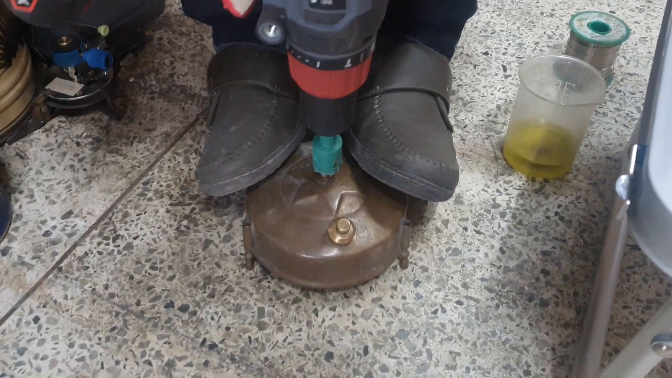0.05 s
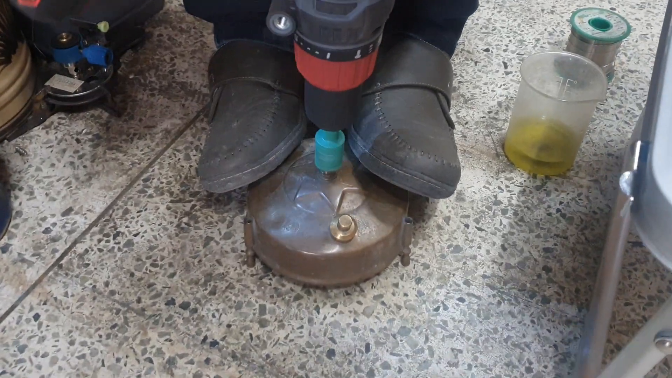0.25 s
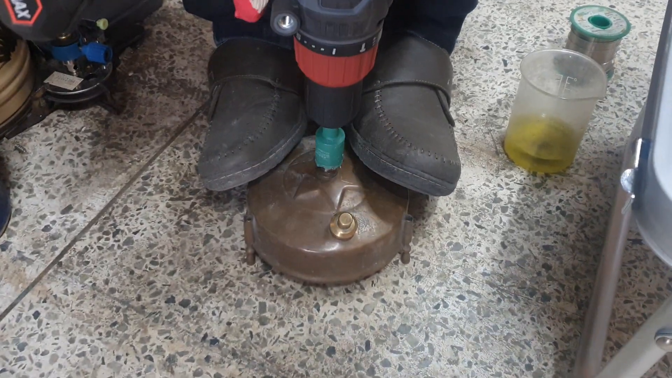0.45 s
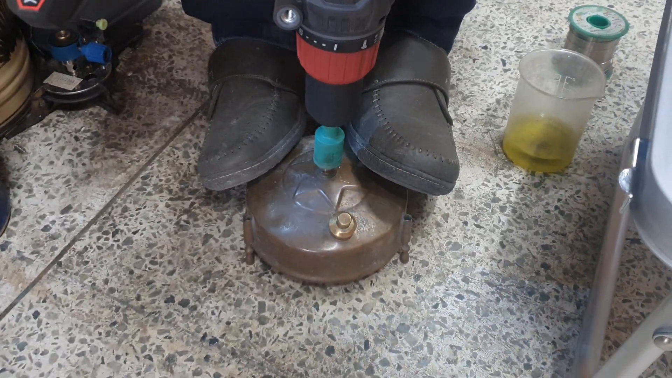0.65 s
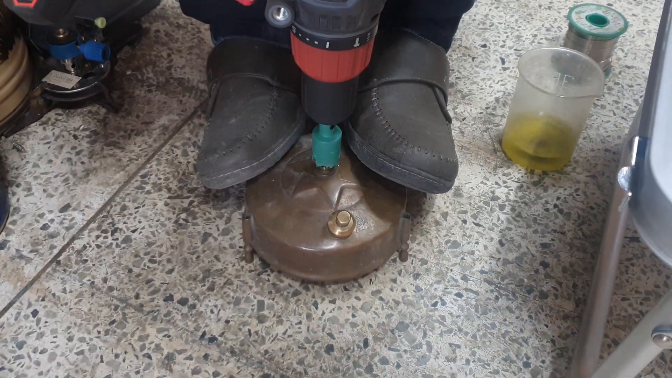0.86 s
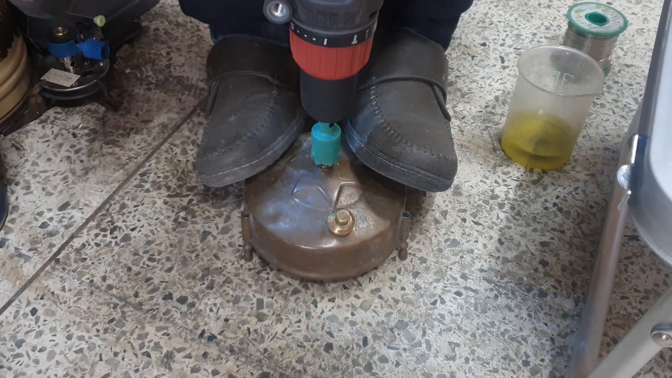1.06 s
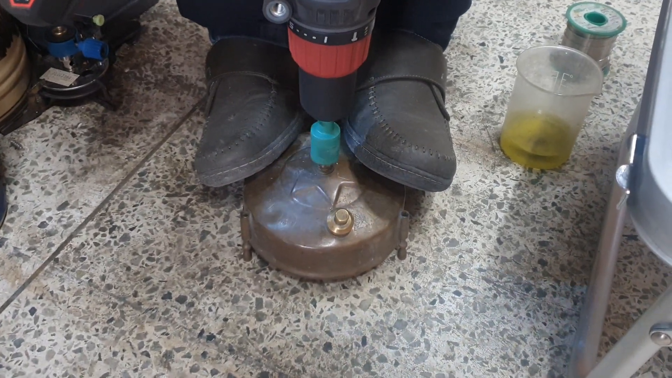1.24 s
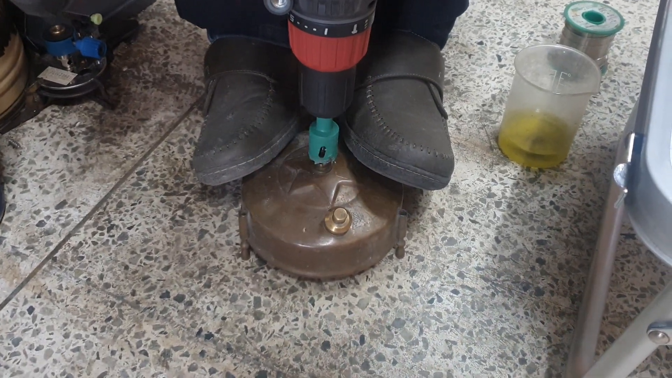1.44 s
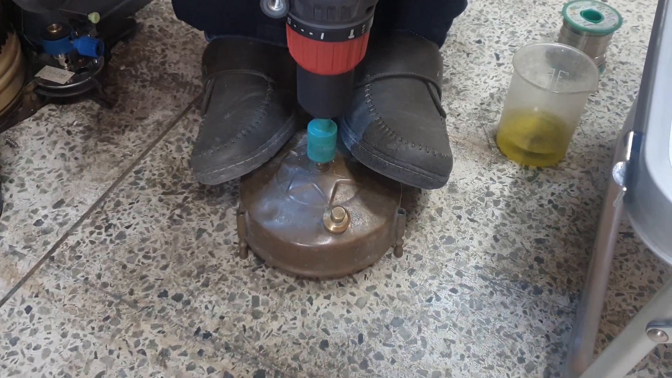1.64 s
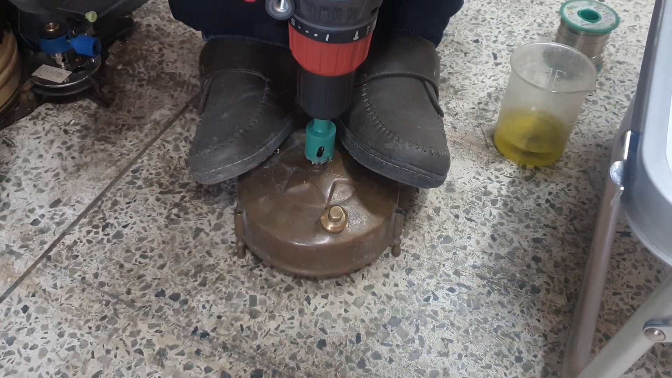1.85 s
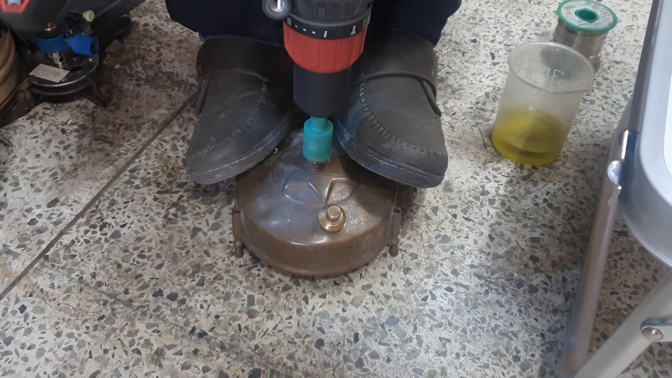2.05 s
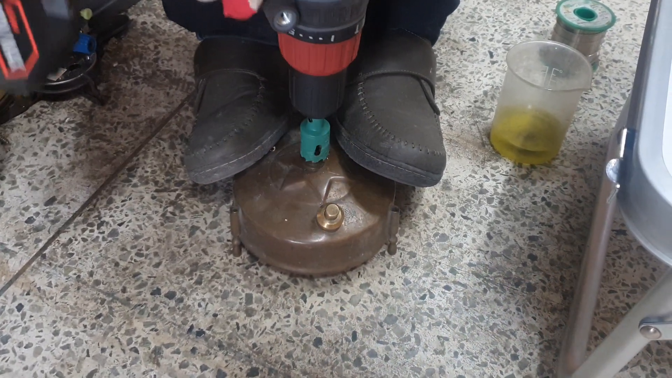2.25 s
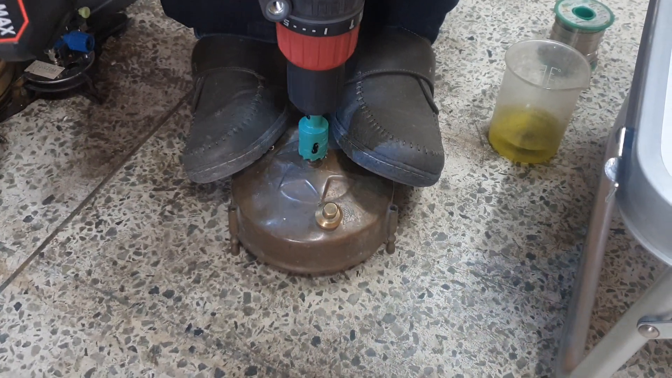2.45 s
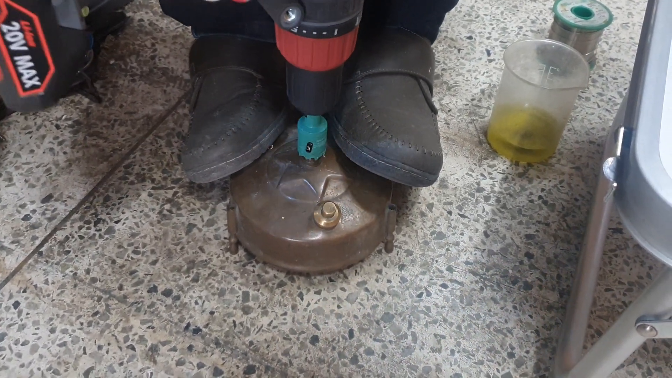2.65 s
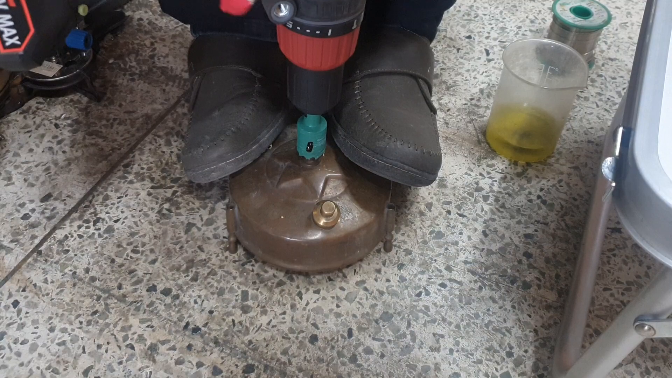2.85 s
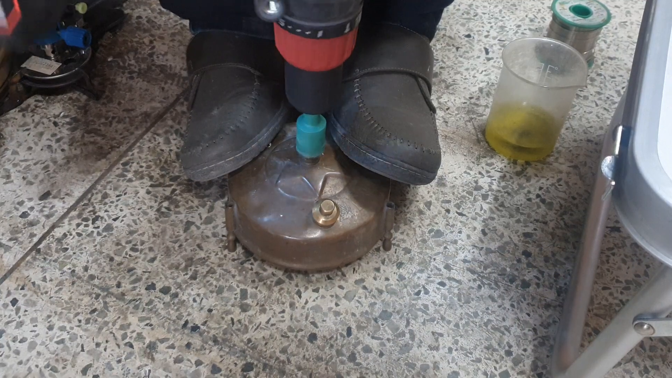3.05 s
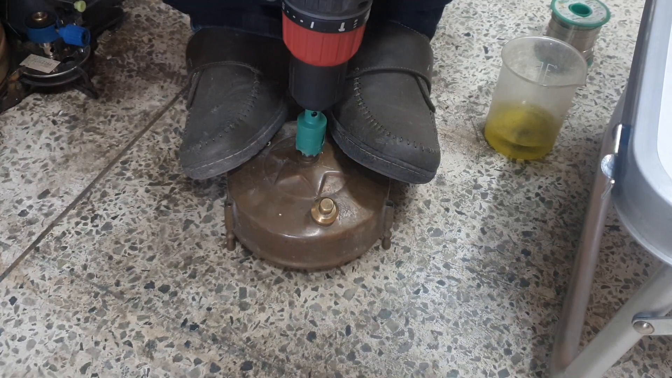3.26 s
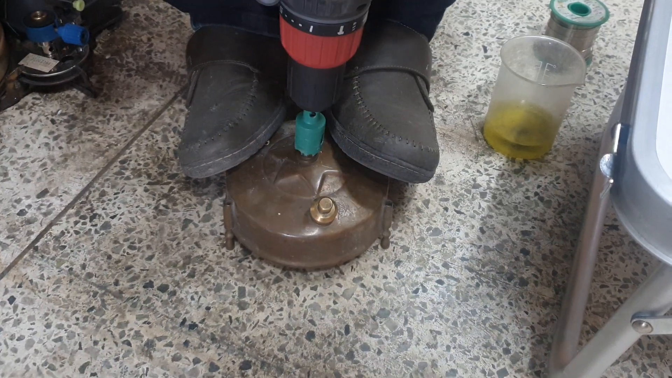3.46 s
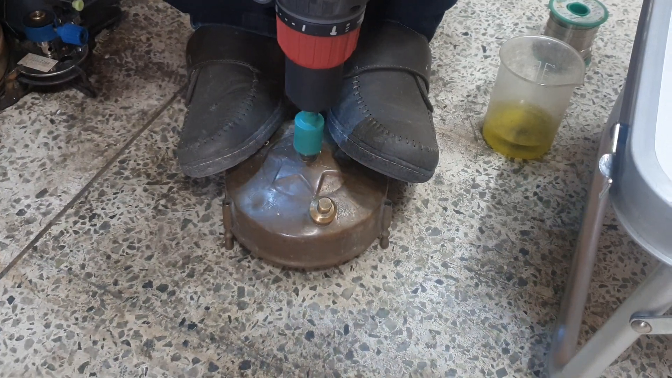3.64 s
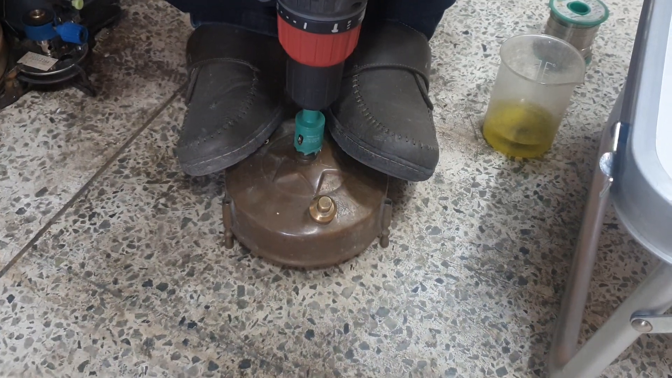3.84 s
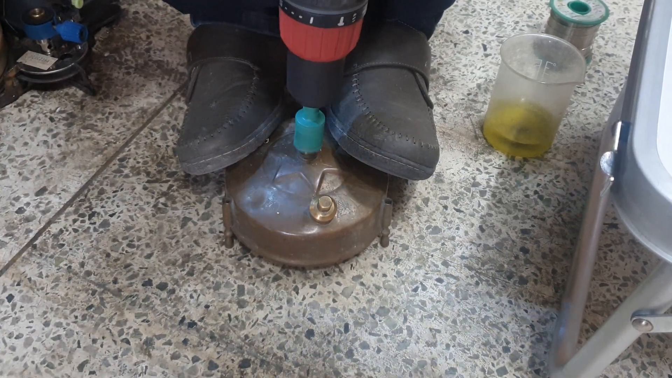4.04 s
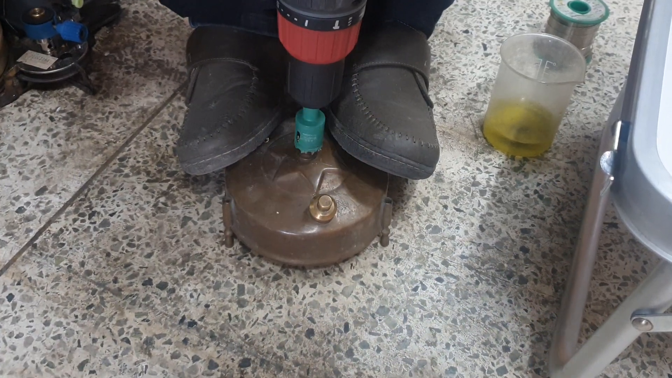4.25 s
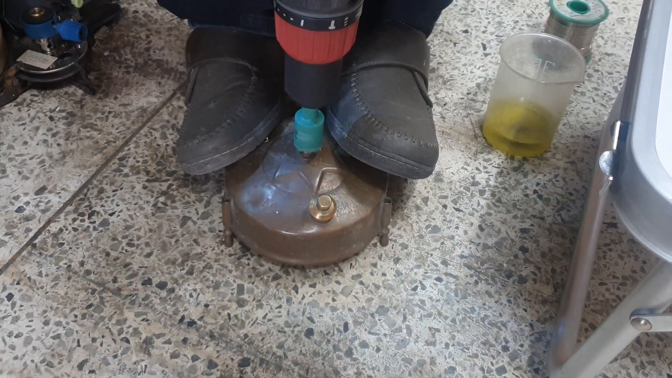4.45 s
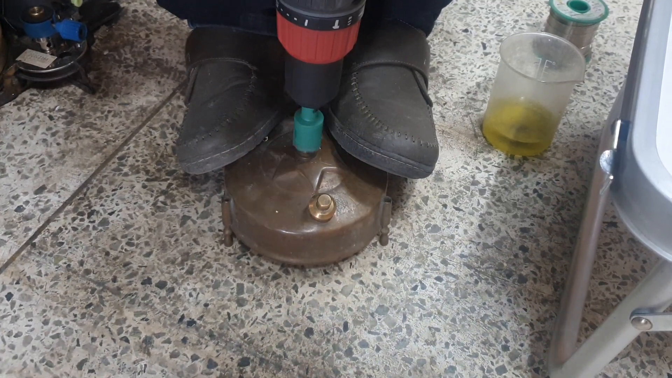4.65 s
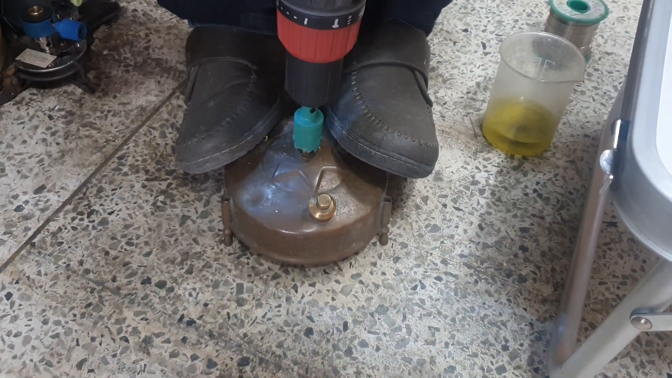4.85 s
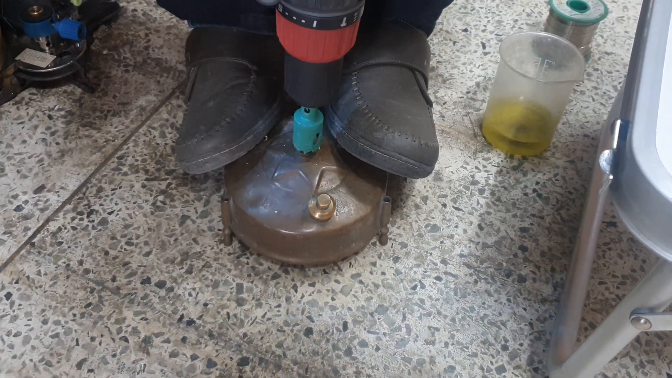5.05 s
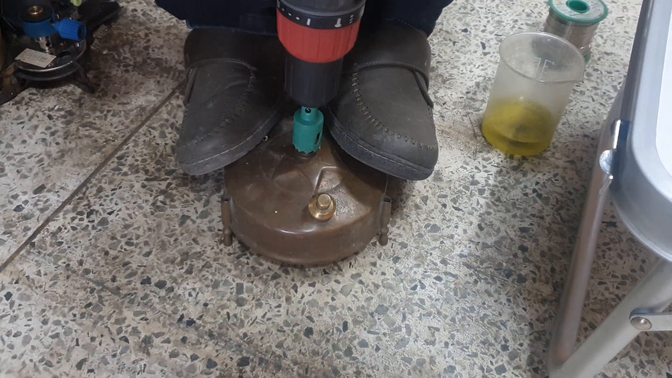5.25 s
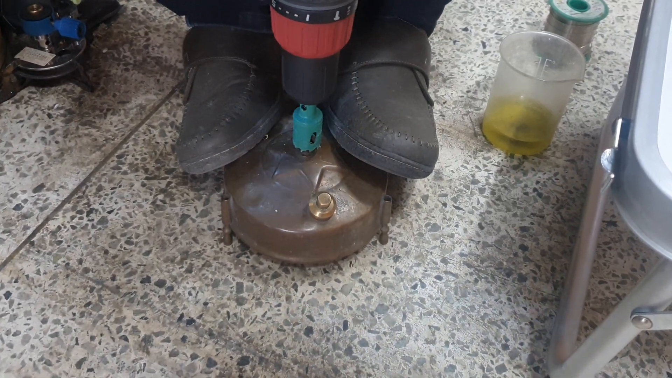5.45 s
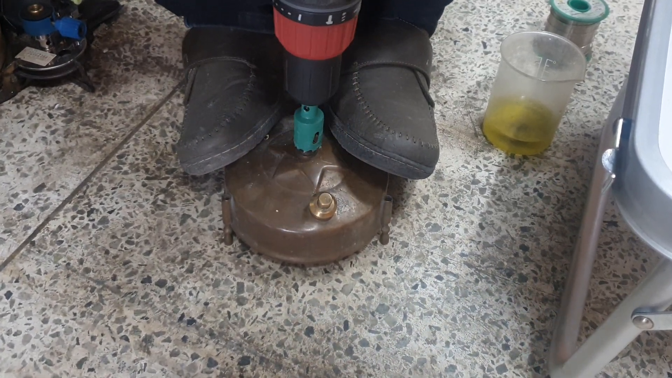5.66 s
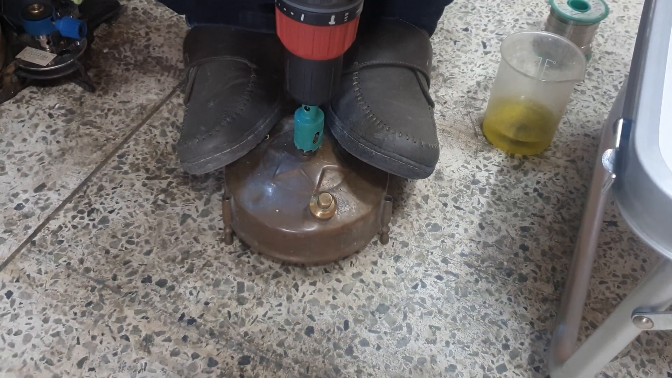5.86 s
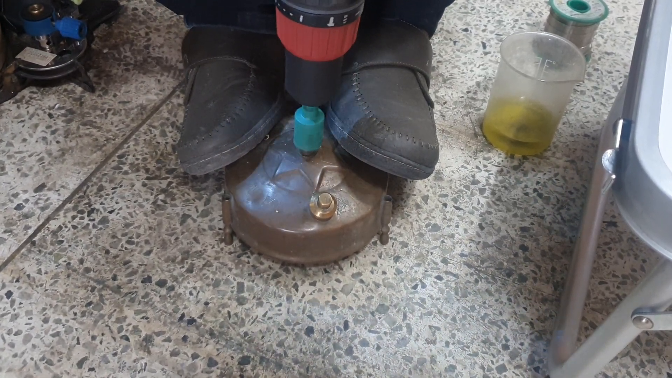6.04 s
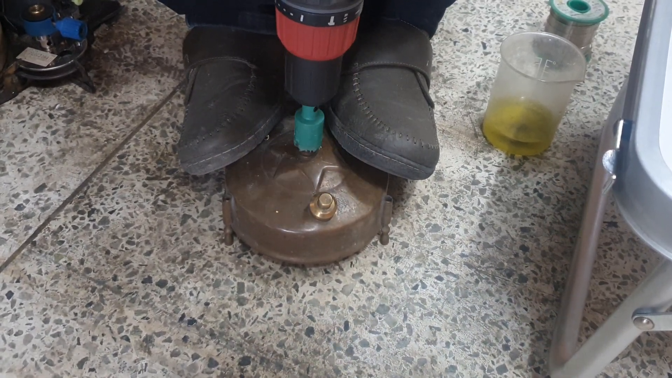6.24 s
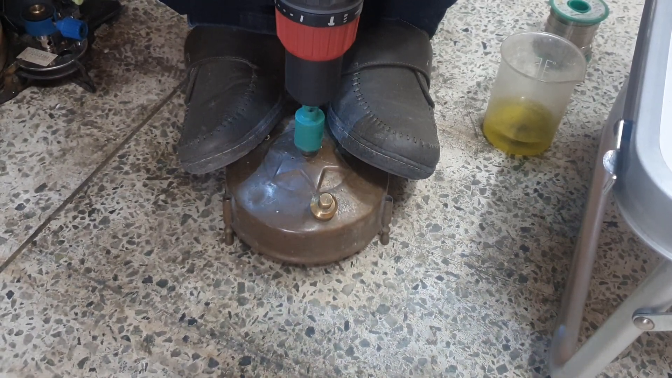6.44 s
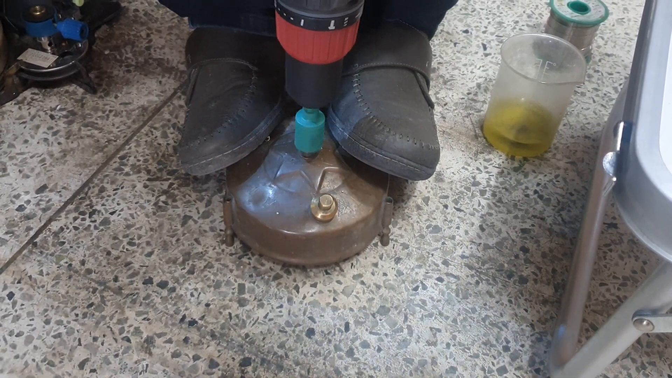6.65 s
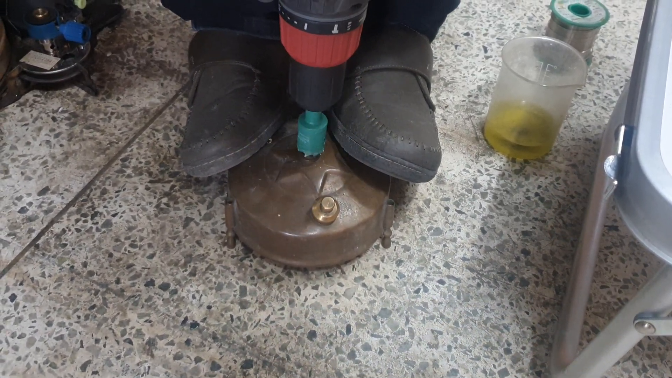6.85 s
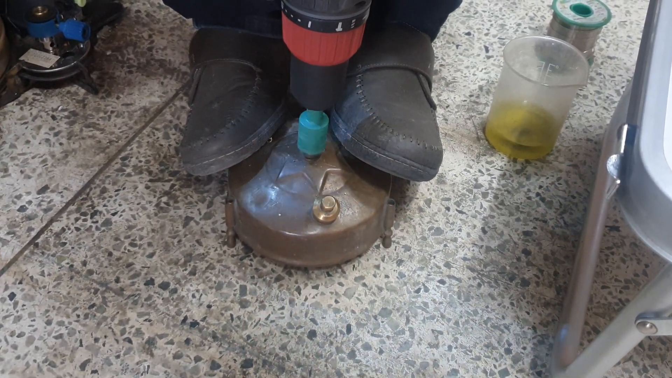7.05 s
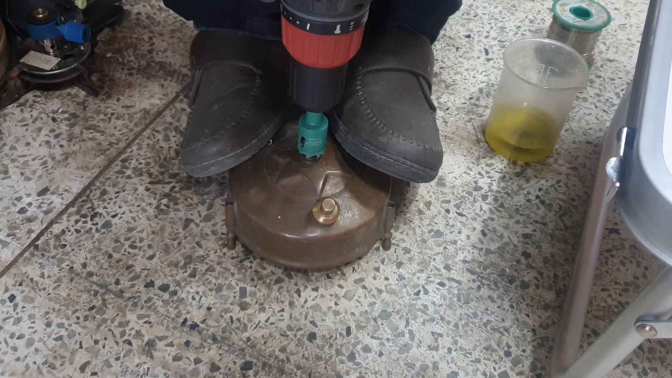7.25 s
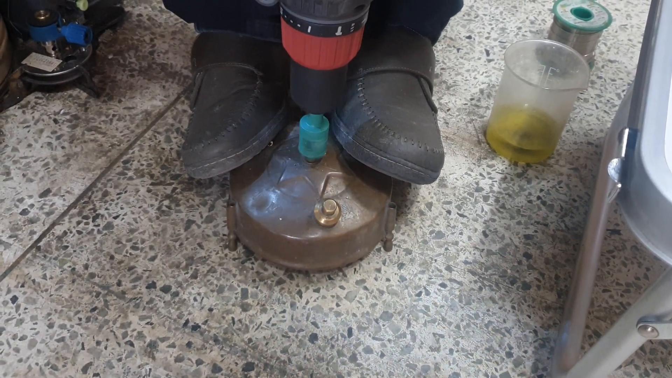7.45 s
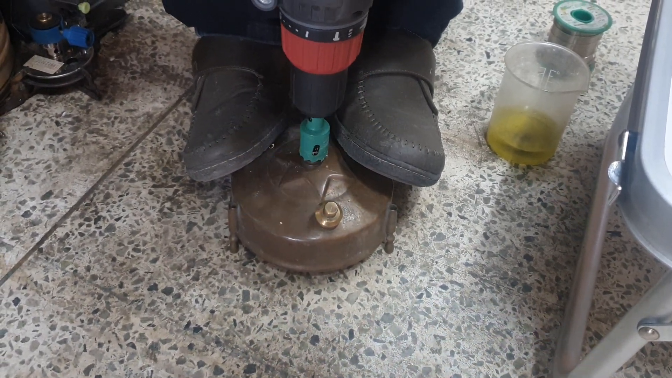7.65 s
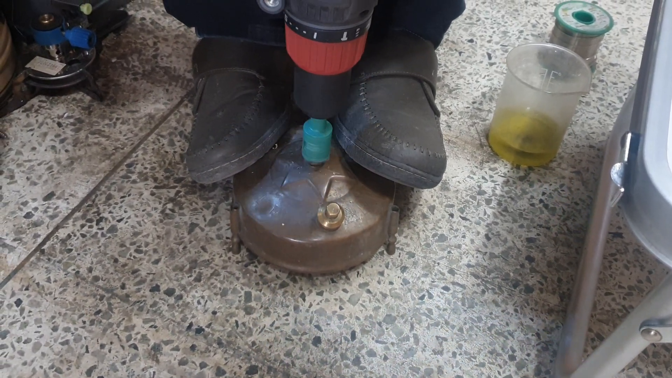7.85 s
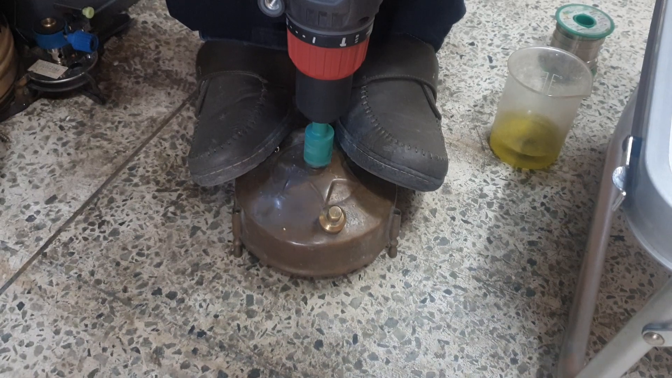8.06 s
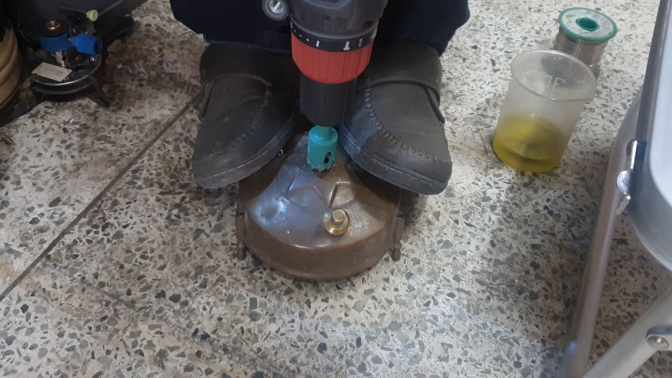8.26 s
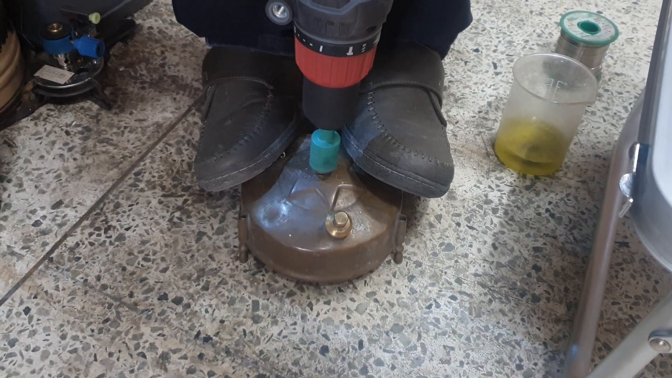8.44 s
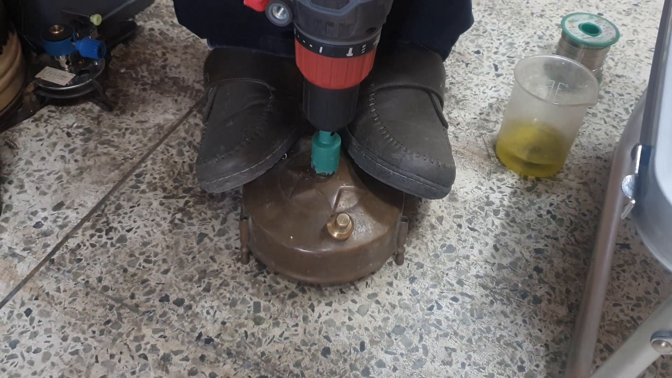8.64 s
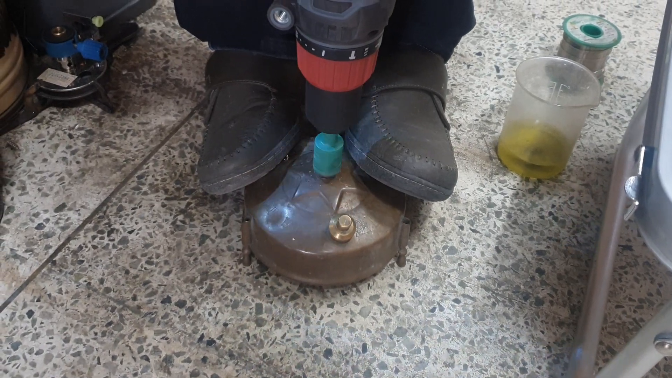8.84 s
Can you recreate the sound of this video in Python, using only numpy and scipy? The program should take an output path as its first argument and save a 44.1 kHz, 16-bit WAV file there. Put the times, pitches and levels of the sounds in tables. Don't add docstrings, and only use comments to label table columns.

```python
import sys
import numpy as np
from scipy import signal
from scipy.io import wavfile
from scipy.ndimage import uniform_filter1d

SR = 44100
rng = np.random.default_rng(int(sys.argv[2]) if len(sys.argv) > 2 else 0)


def field_ratio(decibels):
    return 10 ** (np.asarray(decibels, dtype=float) / 20)


def put_to_file(sound):
    columns = np.atleast_2d(sound).T
    safe = np.clip(columns, -1, 1)
    whole_steps = np.round(safe * 32767)
    wavfile.write(sys.argv[1], SR, whole_steps.astype(np.int16))


N = 392490
MID_SIDE = np.array([[1], [-1]])


def rms_one(x):
    return x / np.sqrt(np.mean(x ** 2) + 1e-20)


def at_hz(points, hz):
    table_hz, values = np.array(points)[:, 0], np.array(points)[:, 1]
    return np.interp(np.log(hz), np.log(table_hz), values)


def drift(rate_hz):
    r = np.exp(-2 * np.pi * rate_hz * 16 / SR)
    noise = rng.standard_normal(N // 16 + 3002)
    slow = signal.lfilter([1], [1, -2 * r, r * r], noise)[3000:]
    return np.interp(np.arange(N) / 16, np.arange(len(slow)), rms_one(slow))


def resonance(x, hz, width_hz):
    r = np.exp(-np.pi * width_hz / SR)
    poles = [1, -2 * r * np.cos(2 * np.pi * hz / SR), r * r]
    return signal.lfilter(np.array([1, 0, -1]) * (1 - r * r) / 2, poles, x)


def band(x, low_hz, high_hz):
    sos = signal.butter(2, [low_hz, min(high_hz, .45 * SR)], "band", fs=SR, output="sos")
    return signal.sosfilt(sos, x)


def placed(pair, hz):
    # pitch_hz, left_right_likeness (0 to 1)
    likeness = [(150, .94), (700, 0.73), (1500, 0.64), (4000, 0.48), (12000, 0.19)]
    # pitch_hz, left_minus_right_db
    lean_left = [(60, -0.5), (180, 1.5), (550, 6), (1650, 10), (5000, 12), (9500, 4), (13500, 14.5)]
    alike = np.clip(at_hz(likeness, hz), 0, 1)
    lean = field_ratio(at_hz(lean_left, hz))
    left, right = np.sqrt(1 + alike) * pair[0] + np.sqrt(1 - alike) * pair[1] * MID_SIDE
    return np.array([lean * left, right]) * np.sqrt(2 / (1 + lean ** 2 + 2 * alike * lean))


def teeth(per_s, spread_db):
    sizes = field_ratio(spread_db * np.minimum(rng.exponential(1, N), 5))
    chance = per_s * field_ratio(4 * drift(60)) / SR
    torn = rms_one(sizes * (rng.random(N) < chance))
    chips = uniform_filter1d(torn, size=6) ** 2 * 6
    return rng.standard_normal((2, N)) * np.sqrt(.5 + 0.19 * chips)


def cut_levels():
    # teeth_bite_s, spin_up_s, hold_s, full_speed_rasp_db, swell_over_hold_db
    pulls = [(0.266, 0.12, 0.0023, -17, -2.5), (0.73, 0.089, 0.098, -26, -3.5),
             (1.173, 0.073, .13, -29, .5), (1.615, 0.076, 0.15, -27, 1.5), (2.062, 0.084, 0.055, -25.5, 5),
             (3.129, 0.063, .12, -28.5, 2.5), (3.593, 0.082, 0.14, -26, 3.5), (4.075, 0.07, .17, -25, 2.5),
             (4.535, 0.051, .15, -26, 3), (4.962, 0.067, 0.11, -24, -1),
             (5.422, 0.0095, 0.021, -41.5, -0.5), (5.973, .014, 0.25, -28.5, 2.5),
             (6.526, .1, 0.14, -26, 3), (6.987, 0.06, 0.16, -25.5, 4), (7.45, 0.074, 0.15, -23.5, 0.5),
             (7.902, .12, .14, -25, 1.5), (8.376, 0.067, 0.19, -24.5, 2.5), (8.868, 0.049, 0.2, -28.5, 1)]
    # shell_db, chip_sizzle_db, base_drum_db (all re rasp), braking_db_per_s
    pressure = [(-16.5, -0.5, -31, 211), (-11.5, -4, -22.5, 448), (-9, -4, -21, 414.5),
                (-8.5, -4, -22.5, 450.5), (-7, -5, -17, 237.5), (-8.5, -0.5, -14.5, 403),
                (-9, -1.5, -17, 433.5), (-8.5, -3, -21, 549), (-9, -3, -20.5, 389), (-7, -7.5, -15.5, 450),
                (-1.5, -8, -9, 399), (-9, 0.5, -16.5, 238), (-10.5, -2, -18, 400), (-8.5, -4.5, -22.5, 457),
                (-6.5, -5, -16, 430.5), (-8, -2, -20, 424), (-8.5, -1, -22.5, 373), (-8, -6.5, -13, 400)]
    # peak_s, rasp_db, rise_s, fall_s, shell_db (re rasp)
    nudges = [
        (0.001, -62, .001, 0.19, -6.5),
        (2.556, -38.5, 0.012, 0.096, -2),
        (2.797, -44.5, 0.031, 0.044, 2),
        (3.021, -43, 0.0059, 0.13, -0.5),
        (3.125, -44, 0.086, 0.044, 7.5),
        (5.663, -46.5, 0.007, 0.13, -0.5),
        (5.815, -53.5, 0.016, 0.046, 6.5),
        (5.9, -69, 0.12, 0.11, 1),
        (6.293, -30, .01, 0.026, -14),
    ]
    lead_s, lead_db = 0.0096, -60.5
    jump_s, bite_db = 0.0051, -44.5
    spin_bend = 2.31
    brake_knee_s = 0.016
    shell_follows, sizzle_follows, drum_follows = 0.78, 1.19, 0.63
    drum_grows_db = 3
    nudge_span_db, nudge_sizzle_db, nudge_drum_db = 24, -5.5, -6

    t = np.arange(N) / SR
    levels = np.full((4, N), -100.)
    for (s, rise, hold, full_db, swell_db), (shell_db, sizzle_db, drum_db, brake) in zip(pulls, pressure):
        end = s + rise + hold
        short_of_speed = np.clip(1 - (t - s) / rise, 0, 1) ** spin_bend
        short_db = (min(bite_db, full_db) - full_db) * short_of_speed
        db = np.interp(t, [s - lead_s, s - jump_s, s, s + rise, end],
                       [lead_db, lead_db, full_db, full_db, full_db + swell_db], left=-200)
        db = db + short_db * np.clip(1 + (t - s) / jump_s, 0, 1)
        late = np.clip(t - end + brake_knee_s, 0, None)
        db = db - brake * late ** 2 / (late + 1.36 * brake_knee_s)
        db = db - 500 * np.clip(t - end - .08, 0, None)
        below = np.minimum(db - full_db, 0)
        grown = drum_grows_db * np.clip((t - end) / (rise + hold), -1, 0)
        parts = [drum_db + grown + (drum_follows - 1) * below,
                 shell_db + (shell_follows - 1) * below,
                 0 * t,
                 sizzle_db + (sizzle_follows - 1) * np.maximum(below, -15)]
        levels = np.maximum(levels, np.where(db < -80, -200, db + parts))
    for s, peak_db, rise, fall, shell_db in nudges:
        db = peak_db - nudge_span_db * np.maximum((s - t) / rise, (t - s) / fall)
        parts = np.array([[shell_db + nudge_drum_db], [shell_db], [0], [nudge_sizzle_db - .5 * shell_db]])
        levels = np.maximum(levels, db + parts)
    return levels


def rasp():
    # pitch_hz, level_db
    cut_colour = [(76, -52), (130, -26.5), (202, -12.5), (376, -21), (539, -5), (699, -6.5), (1130, 1.5),
                  (1350, -23), (1720, -5), (2570, -3), (3470, -6), (7000, -12.5), (13600, 0.5),
                  (15600, -11.5)]
    # pitch_hz, width_hz, lift_db
    shell_modes = [(225, 85, 3.5), (534.6, 50, 10), (660, 48, 2), (1112, 150, 6), (1490, 39, 4.5),
                   (1700, 78, 10.5), (2590, 210, 3.5), (2885, 20, 3), (4680, 110, 4), (8830, 780, 9)]
    fades = [228, 173, 191, 241]
    linger_db = -20.5
    t = np.arange(N) / SR
    levels = []
    for cut_db, fade in zip(cut_levels(), fades):
        ring_db = np.maximum.accumulate(cut_db + fade * t) - fade * t + linger_db
        levels.append(10 * np.log10(field_ratio(2 * cut_db) + field_ratio(2 * ring_db)))

    feeds = [teeth(2500, spread_db=2.0), teeth(2500, spread_db=3.0)]
    for hz, width_hz, lift_db in shell_modes:
        lift = (field_ratio(lift_db) - 1) * field_ratio(3 * drift(7))
        feeds = [f + lift * resonance(f, hz, width_hz) for f in feeds]

    out, wobble = np.zeros((2, N)), drift(25)
    limits_hz = [140, 400, 1400, 7500, 16400]
    for low, high, level_db in zip(limits_hz, limits_hz[1:], levels):
        edges = np.geomspace(low, high, round(2.4 * np.log2(high / low)) + 1)
        part = 0
        for k, (a, b) in enumerate(zip(edges, edges[1:])):
            hz = np.sqrt(a * b)
            gain = field_ratio(at_hz(cut_colour, hz) + 1.53 * drift(20))
            part = part + gain * placed(band(feeds[k % 2], a, b), hz)
        out += part / np.std(part.mean(axis=0)) * field_ratio(level_db + .8 * wobble - 1.5)
    return out


def gears():
    # emerges_s, held_s, top_hz, spin_up_time_constant_s, level_db
    whines = [(1.195, .13, 2320, .065, -43), (1.64, .17, 2330, .042, -34), (2.112, .075, 1780, .013, -31),
              (3.165, .088, 2850, .052, -31), (3.623, .155, 2660, .044, -31), (4.12, .15, 2500, .055, -32),
              (4.571, .135, 2310, .042, -31), (6.035, .165, 2870, .065, -32), (6.565, .16, 2730, .055, -32),
              (7.02, .165, 2230, .03, -31), (8.03, .1, 2230, .08, -32), (8.415, .185, 2230, .042, -31)]
    # multiple_of_mesh_rate, level_db
    mesh_partials = [(.25, -14), (1, 2), (2, -11)]
    emerge_hz = 1500
    sag_hz_per_s2, sag_s = 260000, .048
    load_db_per_s = 22
    out = np.zeros(N)
    speed_jitter = 1 + .006 * drift(70)
    load = field_ratio(1 + 2.4 * drift(45))
    for s, held, top_hz, spin_up, level_db in whines:
        t = np.arange(round((held + sag_s) * SR)) / SR
        at = slice(round(s * SR), round(s * SR) + len(t))
        hz = top_hz - (top_hz - emerge_hz) * np.exp(-t / spin_up)
        hz = hz - sag_hz_per_s2 * np.maximum(t - held, 0) ** 2
        turn = 2 * np.pi * np.cumsum(hz * speed_jitter[at]) / SR
        tone = sum(field_ratio(db) * np.sin(k * turn) for k, db in mesh_partials)
        swell = field_ratio(level_db + load_db_per_s * (t - held / 2))
        out[at] += tone * swell * load[at] * signal.windows.tukey(len(t), .2)
    return out


def ticks():
    # start_s, peak_db, centre_hz, bright_share_db
    cracks = [(0.276, -15, 1620, 1), (0.338, -1, 2590, -8), (2.479, -40.5, 1710, 5.5),
              (2.555, -13, 2700, -4), (2.607, -23.5, 534, -19), (2.664, -35.5, 641, -20),
              (2.717, -40, 1170, -26), (3.005, -37, 11400, -5), (3.022, -25, 1700, -11),
              (3.147, -20, 660, 10), (3.393, -27.5, 1730, -14), (3.592, -30.5, 1730, -10),
              (4.073, -31, 2720, -11), (4.097, -15, 2750, -9), (5.219, -33, 2790, -20),
              (5.295, -39, 2640, 2.5), (5.328, -45, 2620, 9.5), (5.42, -34, 996, -19),
              (5.665, -25.5, 1700, -20), (5.734, -37, 560, 11), (5.795, -30.5, 840, -12),
              (5.817, -32, 1140, -30), (5.925, -44, 1490, 5), (3.178, -6, 2600, 4.5),
              (5.973, -17, 11100, 5), (5.983, -3, 2620, -27), (6.29, -11, 8940, -15),
              (6.506, -50, 10900, 11), (6.531, -11.5, 9100, -15), (7.902, -28, 2850, -5.5)]
    out, t = np.zeros(N), np.arange(3000) / SR
    draws = rng.standard_normal((len(cracks), 3000))
    for (s, peak_db, hz, bright_db), draw in zip(cracks, draws):
        crack = draw * (np.exp(-t / 0.0033) + 0.092 * np.exp(-t / 0.029))
        centre_hz = min(hz, 4000)
        body = band(crack, centre_hz * 0.4, centre_hz * 1.7)
        bright = band(crack, 3500, 16000)
        crack = body / np.abs(body).max() + field_ratio(bright_db) * bright / np.abs(bright).max()
        out[round(s * SR):][:3000] += field_ratio(peak_db - 7.5) * crack
    return out


def tank():
    # start_s, level_db
    jolts = [
        (.352, -14),
        (0.45, -26),
        (6.288, -43.5),
        (2.24, -35.5),
    ]
    # pitch_hz, level_db, t60_s
    ring_modes = [(1120, -21, .2), (1480, -18, .2), (2099, -12, .33), (2514, -7, .17), (3246, -17, .22),
                  (3709, -24, .25), (4323, -12, .14), (4608, -8, .16)]
    out = np.zeros(N)
    at = [round(s * SR) for s, db in jolts]
    spread_db = 1.5 * rng.standard_normal((len(jolts), len(ring_modes)))
    for (hz, level_db, t60), chance_db in zip(ring_modes, spread_db.T):
        r, w = field_ratio(-64 / (t60 * SR)), 2 * np.pi * hz / SR
        strike = np.full(N, 1e-18)
        strike[at] = field_ratio(np.array(jolts)[:, 1] + level_db + chance_db)
        ring = signal.lfilter([0, np.sin(w)], [1, -2 * r * np.cos(w), r * r], strike)
        out += ring * field_ratio(3 * drift(30))
    return out


def squeals():
    # start_s, length_s, pitch_hz, level_db, t60_s, overtones_db
    binds = [
        (5.105, 0.049, 4300, -27.5, 0.11, -15),
        (6.803, 0.0055, 4860, -23, 0.078, 3.5),
        (6.29, 0.0057, 4450, -30.5, 0.054, 8.5),
        (0.46, 0.022, 8812, -38, 0.23, -61),
    ]
    out, t = np.zeros(N), np.arange(SR // 4) / SR
    for s, length, hz, level_db, t60, overtone_db in binds:
        freed = np.maximum(t - length, 0)
        wander = .035 * drift(300)[:len(t)] * np.exp(-freed / .02)
        turn = 2 * np.pi * np.cumsum(hz * (1 + wander)) / SR
        tone = np.sin(turn) + field_ratio(overtone_db) * (np.sin(2 * turn) + 0.22 * np.sin(3 * turn))
        out[round(s * SR):][:len(t)] += tone * field_ratio(level_db - 60 * freed / t60) * np.minimum(t / 0.0026, 1)
    return out


def drive():
    # start_s, end_s, pitch_hz, level_db
    lines = [(2.63, 2.799, 11300, -69), (2.76, 2.782, 11300, -55), (2.64, 2.8, 5776, -89),
             (4.33, 4.53, 8791, -61), (5.5, 5.66, 11500, -77.5), (5.83, 5.95, 1590, -72),
             (.52, .59, 361.7, -68), (.65, .71, 365.5, -72), (2.43, 2.54, 410, -72.5),
             (3.43, 3.52, 318, -77.5), (8.72, 8.822, 380, -75)]
    out = np.zeros(N)
    for start, end, hz, level_db in lines:
        t = np.arange(round((end - start) * SR)) / SR
        tone = field_ratio(level_db + 3) * np.sin(2 * np.pi * hz * t)
        out[round(start * SR):][:len(t)] += tone * signal.windows.tukey(len(t), .1)
    return out * field_ratio(4.2 * drift(40))


def thumps():
    # start_s, peak_db
    pushes = [
        (1.54, -62),
        (2.01, -48.5),
        (6.865, -38),
        (6.925, -40.5),
        (6.971, -37),
        (8.161, -30.5),
        (8.272, -51.5),
    ]
    out, t = np.zeros(N), np.arange(1500) / SR
    push = np.sin(2 * np.pi * 170 * t) * np.exp(-t / 0.0023)
    for s, peak_db in pushes:
        out[round(s * SR):][:1500] += field_ratio(peak_db + 6) * push
    return out


def room(x):
    t60_s, level_db = 0.25, -22.5
    t = np.arange(SR // 2) / SR
    tail = rng.standard_normal((2, len(t))) * np.minimum(t / .012, 1)
    early = tail * field_ratio(-60 * t / t60_s) * .5
    tail = early + band(tail, 150, 4600) * field_ratio(-60 * t / (0.51 * t60_s))
    tail = tail / np.sqrt(np.sum(tail ** 2) / 2)
    return field_ratio(level_db) * signal.fftconvolve(x, tail, axes=1)[:, :N]


def background():
    # pitch_hz, level_db
    air_colour = [(59, -33), (100, -27), (163, -9.5), (415, -15), (1310, -15.5), (2580, -16.5),
                  (7140, -27.5), (14100, -15), (16000, -32)]
    # time_s, level_db
    hum_line = [(0.0, -61), (2.82, -59.5), (2.97, -73), (3.05, -56.5), (4.91, -61.5), (5.15, -50.5),
                (5.38, -63.5), (6.29, -55.5), (6.42, -73.5), (6.62, -56), (8.78, -60), (8.9, -56.5)]
    air_db, rumble_db = -70, -62.5
    hum_hz, hum_width_hz = 63, 6
    white = rng.standard_normal((2, 2, N))
    edges = np.geomspace(130, 16400, 12)
    air = sum(field_ratio(at_hz(air_colour, np.sqrt(a * b))) * band(white[k % 2], a, b)
              for k, (a, b) in enumerate(zip(edges, edges[1:])))

    hum_db = np.interp(np.arange(N) / SR, *np.transpose(hum_line)) + 4 + 3.2 * drift(7)
    turn = 2 * np.pi * np.cumsum(hum_hz + hum_width_hz * .3 * drift(4)) / SR
    hum = field_ratio(hum_db) * np.sin(turn + .38 * MID_SIDE)

    low = rng.standard_normal((2, N))
    rumble = rms_one(band(low[0] + .45 * low[1] * MID_SIDE, 36, 105)) * field_ratio(rumble_db + 3 * drift(4))
    return field_ratio(air_db - 0.5 + 1.5 * drift(3)) * rms_one(air) + hum + rumble


def scene():
    point = gears() + ticks() + tank() + squeals() + drive()
    near = rasp() + point * field_ratio(np.array([[3.2], [-5.5]]))
    near[1] = np.roll(near[1], 3)
    return near + room(near) + thumps() + background()


def band_limit(x):
    return signal.sosfilt(signal.butter(12, 17000, fs=SR, output="sos"), x)


def record(dry):
    rounded = 1.265 * np.tanh(dry / 1.108)
    top_cut = signal.ellip(8, .5, 42, 15700, fs=SR, output="sos")
    return band_limit(signal.sosfilt(top_cut, rounded))


dry = scene()
out = record(dry)
put_to_file(out)
```